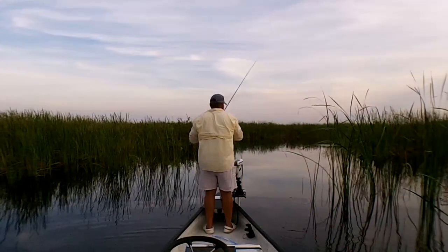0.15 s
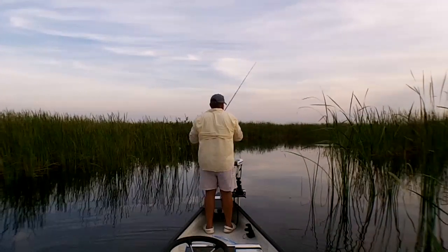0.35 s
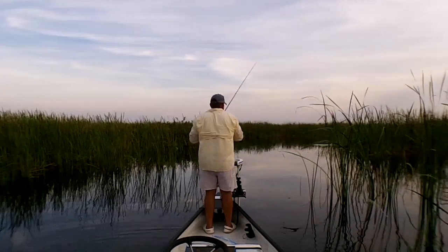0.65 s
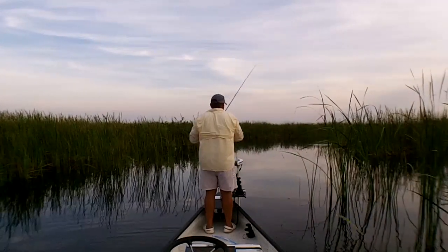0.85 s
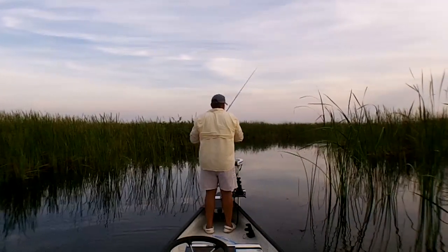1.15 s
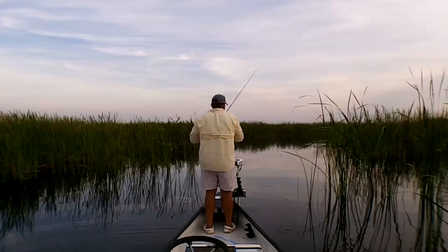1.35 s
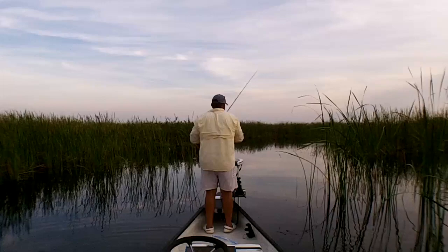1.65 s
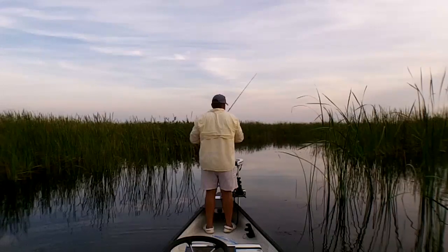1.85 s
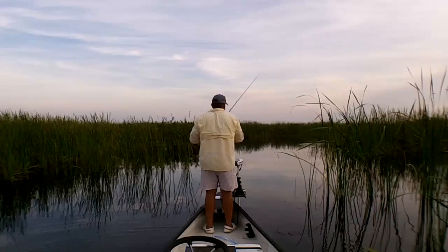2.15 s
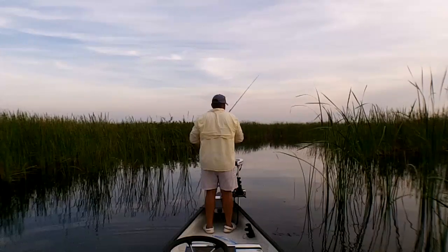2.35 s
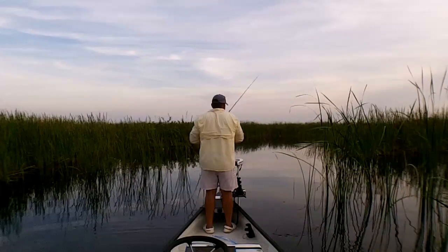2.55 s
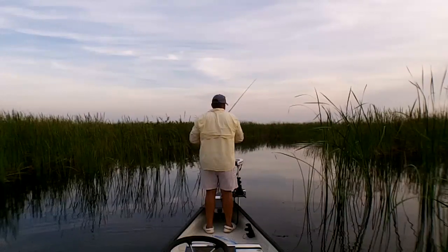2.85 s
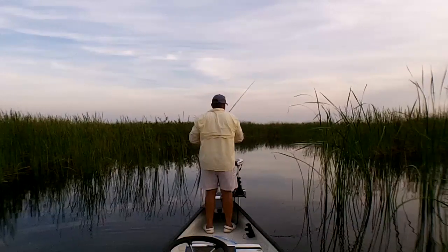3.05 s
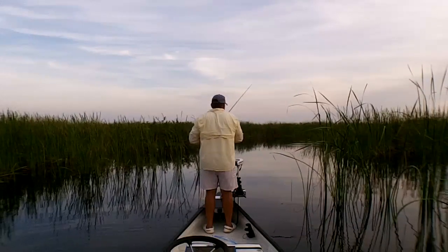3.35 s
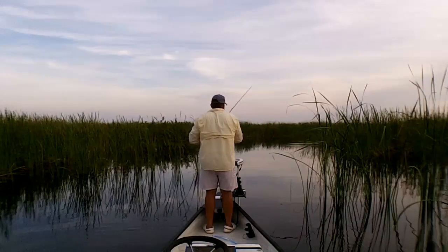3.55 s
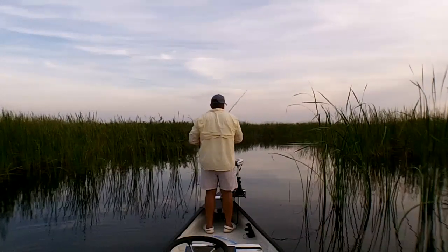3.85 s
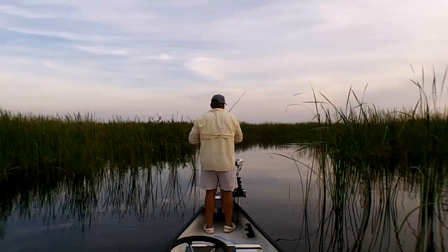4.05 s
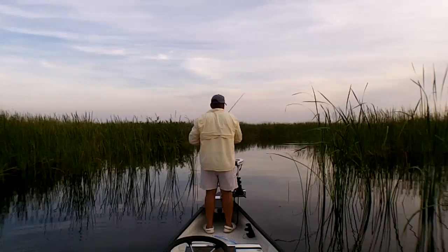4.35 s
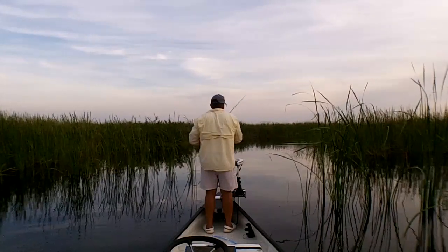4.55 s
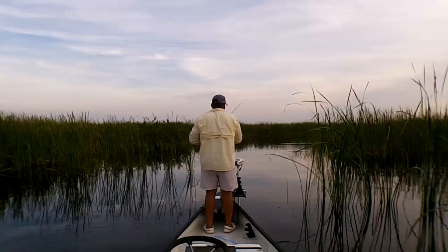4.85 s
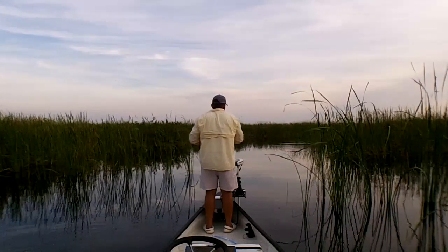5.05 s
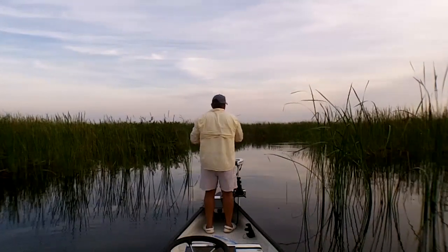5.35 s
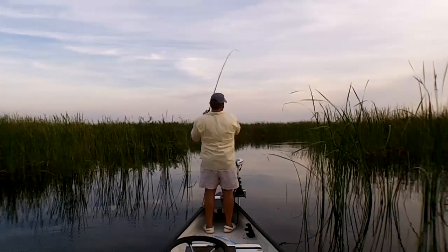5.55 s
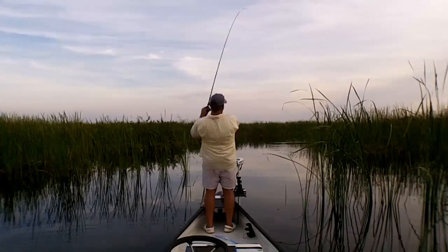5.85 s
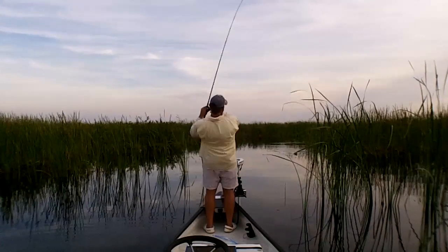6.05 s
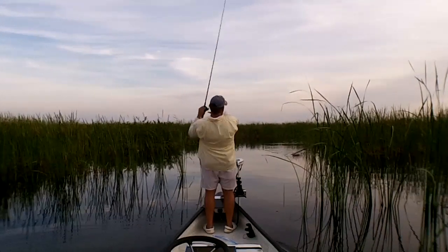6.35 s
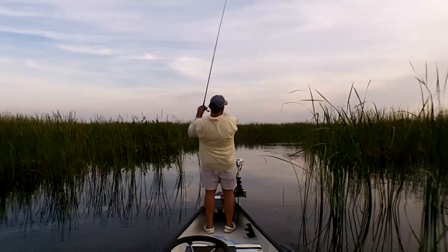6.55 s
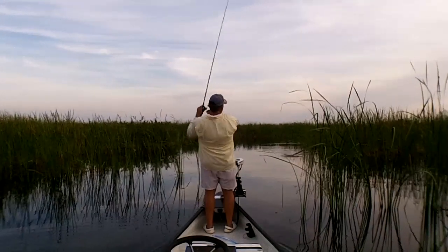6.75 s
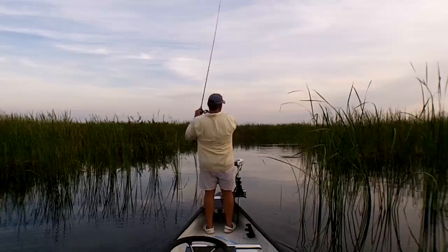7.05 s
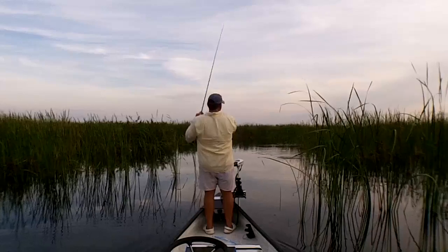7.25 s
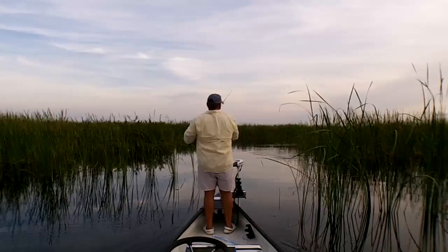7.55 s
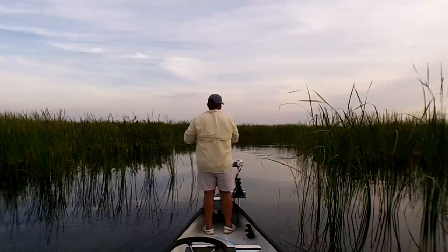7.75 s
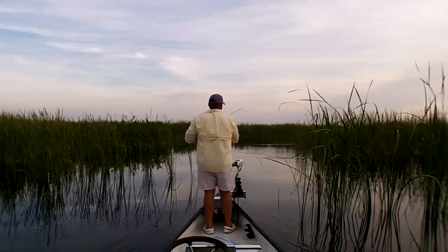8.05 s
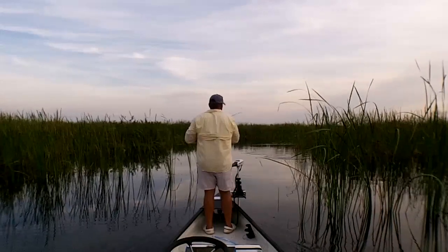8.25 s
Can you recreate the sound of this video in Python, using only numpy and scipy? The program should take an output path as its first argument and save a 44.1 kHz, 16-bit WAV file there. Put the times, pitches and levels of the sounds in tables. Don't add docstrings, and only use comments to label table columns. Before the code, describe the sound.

An angler's reel snaps loudly, then ticks and rustling sleeves, water plinks and a sharp double rod knock amid repeated dry bird chips in reeds.

```python
import sys
import numpy as np
from scipy import signal
from scipy.fft import rfft, irfft
from scipy.io import wavfile
from scipy.ndimage import uniform_filter1d

SR = 44100
rng = np.random.default_rng(int(sys.argv[2]) if len(sys.argv) > 2 else 0)


def convert_level_to_amplitude(level_db):
    exponent = np.asarray(level_db, float) / 20
    return 10 ** exponent


def persist_wave(psi):
    counts = np.round(np.clip(psi, -1, 1) * 32767).astype(np.int16)
    wavfile.write(sys.argv[1], SR, np.atleast_2d(counts).T)


N = 370440


def evened(x):
    return x / np.sqrt(np.mean(x ** 2) + 1e-20)


def peaked(x, db):
    return convert_level_to_amplitude(db) * x / np.max(abs(x))


def add(mix, s, sound):
    part = mix[round(s * SR):][:len(sound)]
    part += sound[:len(part)]


def colour(x, points):
    f, db = np.transpose(points)
    hz = np.fft.rfftfreq(len(x), 1 / SR)
    gain_db = np.interp(np.log(hz + 1), np.log(f + 1), db, left=-90, right=-90)
    return irfft(rfft(x) * convert_level_to_amplitude(gain_db), len(x))


def resonate(x, hz, width):
    turn = np.exp(2j * np.pi * np.cumsum(hz * np.ones(len(x))) / SR)
    r = np.exp(-np.pi * width / SR)
    smooth = signal.lfilter([(1 - r) ** 2], [1, -2 * r, r * r], x * turn.conj())
    return 2 * (turn * smooth).real


def flicker(per_s, depth_db):
    steps = rng.standard_normal(4000)
    return convert_level_to_amplitude(depth_db * np.interp(np.arange(N) * per_s / SR, np.arange(4000), steps))


def swell(s, length):
    t = np.arange(0, N + 64, 32) / SR - s
    share = np.where(t < 0, 0.4, 0.6)
    return -8 * (t / (share * length)) ** 2


def spread(coarse):
    return np.interp(np.arange(N), 32 * np.arange(len(coarse)), coarse)


def patchy(x, depth_db):
    z = signal.stft(x, SR, nperseg=256)[2]
    spots = uniform_filter1d(rng.standard_normal(z.shape[::-1]), size=3, axis=0)
    spots = uniform_filter1d(spots, size=4, axis=1)
    return signal.istft(z * convert_level_to_amplitude(depth_db * evened(spots).T), SR, nperseg=256)[1][:N]


def glides(rows, width, blend):
    out = np.zeros(N)
    for s, length, from_hz, to_hz, db in rows:
        hz = np.geomspace(from_hz, to_hz, round(length * SR))
        air = resonate(rng.standard_normal(SR // 4)[:len(hz)], hz, width(hz.mean()))
        arch = signal.windows.tukey(len(hz), min(blend, 1))
        add(out, s, convert_level_to_amplitude(db) * evened(air) * arch)
    return out


# frequency in Hz, level in dB per Hz.
MARSH_HUSH = [(88, -37), (150, -1.5), (325, -9.5), (1010, -15), (1400, -17), (3080, -18), (3880, -15),
              (5470, -20.5), (6340, -15.5), (6660, -22), (7600, -30.5), (9880, -70), (16700, -120)]
# centre in Hz, width in Hz, level in dB.
INSECT_BANDS = [(6393, 550, -58.5), (3800, 1300, -74)]


def marsh():
    hush = colour(rng.standard_normal(N) * flicker(9, 0.81), MARSH_HUSH)
    out = convert_level_to_amplitude(-50) * evened(hush)
    for hz, width, db in INSECT_BANDS:
        out += convert_level_to_amplitude(db) * evened(resonate(rng.standard_normal(N) * flicker(60, 1.4), hz, width))
    return out


# frequency in Hz, level in dB per Hz.
HULL_RUMBLE = [(24, -44), (40, -9.5), (68, 1.5), (88, -5.5), (107, 1), (135, -8.5), (170, -10),
               (220, -12.5), (320, -18), (420, -23.5)]
# peak in seconds, length in seconds, lift in dB.
WIND_GUSTS = [
    (0.25, 0.55, 3.5),
    (0.984, 0.16, 3),
    (1.44, 1, 2.5),
    (2.618, 0.14, 5),
    (5.91, 0.56, 7),
    (7.08, 0.93, 2.5),
    (7.75, 0.22, 1.5),
    (8.202, 0.1, 4.5),
]


def wind():
    buffet = colour(rng.standard_normal(N), [(14, -16), (24, -19), (31, -26), (38, -9), (48, -36), (62, -57)])
    rumble = colour(rng.standard_normal(N), HULL_RUMBLE)
    gust_db = spread(sum(db * convert_level_to_amplitude(swell(s, length)) for s, length, db in WIND_GUSTS))
    return convert_level_to_amplitude(-56 + 1.5 * gust_db) * evened(buffet) + convert_level_to_amplitude(-49.5 + gust_db) * evened(rumble)


# start in seconds, length in seconds, from Hz, to Hz, level in dB.
FAR_WHISTLES = [
    (.66, .07, 4050, 4400, -56),
    (.825, .12, 4750, 4050, -59),
    (7.08, .06, 5680, 5580, -52),
    (7.105, .08, 4900, 4450, -50),
]


def whistles():
    return glides(FAR_WHISTLES, lambda hz: 90, 0.58)


# start in seconds, peak in dB, pitch in Hz, 60 dB
# decay in seconds.
DRIPS_AND_LAPS = [(0.499, -43.5, 1280, 0.099), (0.848, -39, 691, 0.15), (1.585, -41.5, 1850, 0.05),
                  (2.991, -31, 418, 0.17), (3.19, -62, 301, 0.06), (3.256, -53, 423, 0.049),
                  (3.452, -42, 750, 0.06), (3.506, -38.5, 767, 0.089), (3.682, -28, 1040, 0.038),
                  (3.696, -26.5, 771, 0.082), (3.839, -33.5, 1180, 0.038), (4.14, -44, 1100, 0.048),
                  (4.398, -42.5, 920, 0.06), (4.63, -39, 637, 0.049), (4.657, -37, 1660, 0.095),
                  (4.754, -30.5, 1500, 0.014), (4.803, -39.5, 860, 0.081), (4.89, -42, 1930, 0.06),
                  (5.037, -41.5, 305, 0.051), (6.078, -34, 286, 0.21), (6.16, -58, 323, 0.044),
                  (6.218, -35, 1014, 0.03), (6.311, -32, 1490, 0.054), (6.395, -30.5, 1233, 0.04),
                  (6.594, -37, 855, 0.074), (6.652, -41, 1780, 0.069), (6.775, -31.5, 1860, 0.042),
                  (6.943, -36, 1050, 0.048), (7.499, -39, 1950, 0.039),
                  (2.546, -38.5, 400, 0.19),
    (2.771, -37.5, 294, 0.37),
    (4, -43, 600, 0.095),
    (4.02, -39, 330, 0.25),
    (5.88, -35, 500, 0.084),
    (6.309, -38.5, 586, 0.54),
    (1.751, -44, 850, 0.31),
    (3.2, -38.5, 960, 0.073),
]
# start in seconds, peak in dB, pitch in Hz.
LINE_DROPLETS = [(.897, -42, 2350), (3.521, -40, 1290), (3.683, -35, 1660), (3.748, -41, 1470),
                 (4.0, -43, 616), (4.839, -46, 880), (4.861, -39.5, 1880), (4.911, -40, 1390),
                 (4.935, -39, 1570), (4.985, -43, 1410), (5.039, -43, 940), (6.158, -40, 1510),
                 (6.219, -42, 2310), (6.912, -36.5, 1096), (8.335, -41.5, 910)]


def water():
    out, t = np.zeros(N), np.arange(6000) / SR
    droplets = [(*row, 0.07) for row in LINE_DROPLETS]
    for s, db, hz, t60 in DRIPS_AND_LAPS + droplets:
        fade = convert_level_to_amplitude(-60 * t / t60) * np.minimum(t / 0.00143, 1)
        bubble = np.sin(2 * np.pi * hz * (t + 0.66 * t ** 2))
        splash = evened(resonate(rng.standard_normal(len(t)), hz, 0.65 * hz))
        add(out, s, peaked(fade * (bubble + splash), db - 0.5))
    return out


# frequency in Hz, level in dB.
DULL_CLOTH = [(350, -11), (700, 1), (1400, 5.5), (2400, 0), (3400, -0.5), (5000, -33)]
# frequency in Hz, level in dB.
BRIGHT_CLOTH = [(1600, -38), (2500, -7), (3500, -2.5), (4600, -2), (5600, -6.5), (6800, -11.5), (7600, -32)]
# peak in seconds, length in seconds, level in dB, brightness in dB.
CLOTH_MOVES = [(1.905, 0.032, -49, -12), (2.062, 0.44, -56, -1), (2.381, 0.082, -47.5, -1.5),
               (2.59, 0.15, -50, -3.5), (2.732, 0.12, -52.5, 2), (3.19, 0.019, -51, -12),
               (3.265, 0.027, -48, -4), (3.567, 0.19, -56.5, -30), (3.686, 0.044, -48, 2),
               (3.78, 0.52, -50, -12), (3.997, 0.69, -57.5, -23), (4.293, 0.056, -54, -18),
               (4.648, 0.054, -46, 0.5), (4.761, 0.045, -47, -7), (4.94, 0.28, -52, -2),
               (5.525, 0.1, -61.5, 11.5), (6.08, 0.015, -44, -8), (6.27, 0.21, -45, -9),
               (6.346, 0.08, -39.5, -4), (6.48, 0.1, -61, -1), (6.55, 0.51, -46, -2),
               (6.686, 0.07, -42.5, 4), (6.776, 0.13, -41, -4.5), (6.953, 0.16, -52, 0.5),
               (7.114, 0.094, -49, 2), (7.36, 0.32, -53.5, -14), (7.507, 0.038, -54, -3),
               (8.0, 0.73, -64, -20), (8.249, 0.06, -53, -2), (8.336, 0.045, -53, -9)]
# start in seconds, length in seconds, from Hz, to Hz,
# level in dB.
LINE_SWISHES = [
    (2.04, .13, 4370, 4650, -54),
    (2.35, .08, 3300, 2900, -46.5),
    (5.51, .1, 2400, 2000, -52),
    (6.65, .07, 1500, 5000, -44),
    (7.23, .15, 2900, 1700, -53),
]


def rustle():
    out = glides(LINE_SWISHES, lambda hz: hz / 1.65, 0.7)
    for bright, body, lift_db in ((0, DULL_CLOTH, -4.5), (1, BRIGHT_CLOTH, 1.5)):
        power = sum(convert_level_to_amplitude(db + bright * tilt_db + swell(s, length)) ** 2
                    for s, length, db, tilt_db in CLOTH_MOVES)
        slips = rng.standard_normal(N) * flicker(800, 3.4) * flicker(30, 1.14)
        out += convert_level_to_amplitude(lift_db) * spread(np.sqrt(power)) * evened(colour(slips, body))
    return convert_level_to_amplitude(0.75) * patchy(out, 2.66)


# peak time in seconds, peak in dB, pitch in Hz,
# length in cycles.
REEL_LINE_CRACKLES = [(2.198, -36, 3800, 5), (2.241, -38, 4700, 6), (2.242, -44, 1800, 4),
                      (2.348, -43, 3150, 5), (2.357, -38, 2550, 4.5), (2.377, -32, 2900, 4.3),
                      (2.572, -41, 2570, 6), (2.688, -38, 4400, 6), (3.928, -36, 4200, 2.5),
                      (3.963, -33, 2900, 2.5), (4.686, -33, 4500, 4), (4.758, -35, 5700, 5)]
# peak time in seconds, peak in dB, pitch in Hz,
# length in cycles.
ROD_LINE_CRACKLES = [(6.0752, -35.5, 2320, 4), (6.0795, -36, 3560, 6.6), (6.0965, -40, 3400, 3.6),
                     (6.219, -34.5, 2310, 7), (6.25, -41, 2050, 6), (6.271, -42, 2300, 6),
                     (6.281, -38, 3500, 4), (6.313, -37, 3500, 5), (6.348, -24, 4250, 4),
                     (6.35, -34, 2800, 4.6), (6.373, -29.5, 1760, 3), (6.381, -28, 4200, 5),
                     (6.397, -31, 4100, 4), (6.519, -33, 3380, 3.6), (6.5195, -32, 1900, 4),
                     (6.582, -33.5, 2190, 3), (6.656, -36.5, 950, 4.4), (6.672, -31, 2580, 5),
                     (6.678, -36, 1440, 6.7), (6.681, -30, 4800, 5), (6.688, -29, 1960, 6),
                     (6.693, -28, 2600, 5), (6.6935, -20, 4130, 1.3), (6.699, -35, 4300, 5),
                     (6.709, -28, 4700, 6), (6.724, -35, 4500, 4), (6.761, -38, 1400, 6),
                     (6.7775, -35, 1200, 1.3), (6.8116, -18, 4500, 4.4), (6.818, -35, 4600, 4),
                     (6.827, -34, 4700, 5), (8.2545, -31, 4890, 3), (8.241, -38, 4700, 4),
                     (8.327, -37, 5400, 3), (8.341, -35, 3000, 6), (6.359, -37, 750, 5),
                     (6.345, -33, 1900, 4), (6.74, -40, 1300, 6), (6.575, -33, 4200, 4),
                     (7.107, -35, 4300, 1.5), (7.11, -35, 4800, 6), (7.123, -35.5, 3000, 8),
                     (7.32, -39, 2520, 5.5), (7.341, -39, 1800, 6), (7.345, -40, 2400, 5),
                     (7.363, -41, 2300, 5), (7.446, -39, 1900, 3), (7.5, -34, 2900, 2.5)]


def crackles():
    out = np.zeros(N)
    for s, db, hz, cycles in REEL_LINE_CRACKLES + ROD_LINE_CRACKLES:
        length = cycles / hz
        u = np.arange(-1.5 * length, 1.5 * length, 1 / SR) * hz / cycles
        bell = np.exp(-3.2 * u ** 2)
        tone = np.sin(2 * np.pi * cycles * (u + 0.19 * u ** 2 / 2))
        add(out, s + u[0] * length, convert_level_to_amplitude(db) * bell * tone)
    return out


# peak in seconds, length in seconds, level in dB.
SPOOL_RATTLES = [
    (2.617, 0.11, -48),
    (2.737, 0.086, -45),
    (6.7, 0.05, -50),
]
# frequency in Hz, width in Hz, level in dB.
SPOOL_MODES = [(2500, 150, -3), (3060, 150, 0), (3900, 280, 0), (4500, 130, 3)]


def spool():
    taps = (rng.random(N) < 640 / SR) * rng.standard_normal(N)
    out = sum(convert_level_to_amplitude(db) * evened(resonate(taps * flicker(50, 6.3), hz, width)) for hz, width, db in SPOOL_MODES)
    return spread(sum(convert_level_to_amplitude(db + swell(s, length)) for s, length, db in SPOOL_RATTLES)) * evened(out)


# start in seconds, peak in dB, centre in Hz.
REEL_TICKS = [(0.85, -35, 4500), (1.3338, -28, 3300), (1.8716, -37, 3640), (1.909, -36, 2780),
              (2.122, -36, 4650), (2.197, -39, 3720), (2.24, -35, 3025), (2.5454, -35, 4220),
              (2.716, -44, 2550), (2.7602, -27.5, 4350), (3.274, -32.5, 3450), (3.641, -31, 3940),
              (3.7284, -32, 4370), (3.922, -34, 4070), (3.9634, -33, 3900), (4.037, -36.5, 5210),
              (4.111, -37.5, 3760), (4.629, -35, 3350), (4.686, -29.5, 4200), (4.756, -31, 3620),
              (5.0973, -32, 4100), (5.1475, -34, 4230)]
# start in seconds, peak in dB, centre in Hz.
ROD_KNOCKS = [(6.074, -29, 3520), (6.227, -37, 4440), (6.45, -26, 3800), (6.4628, -11, 3550),
              (6.4712, -12, 3850), (6.519, -24.5, 3330), (6.5824, -35, 3810), (6.654, -26, 5200),
              (6.691, -35, 4100), (6.783, -24.5, 4150), (6.812, -25, 4400), (6.971, -36, 4180),
              (7.0425, -31, 3880), (7.488, -43, 3300), (7.61, -41, 4000), (8.239, -37, 4650),
              (8.261, -30.5, 3460)]
# start in seconds, peak in dB, centre in Hz, width in Hz,
# 60 dB decay in seconds.
ROD_SCUFFS = [
    (0.852, -34, 1480, 2600, 0.18),
    (1.338, -37, 1100, 2600, 0.47),
    (4.632, -30.5, 2510, 4030, 0.11),
    (6.463, -21, 2110, 1490, 0.03),
    (6.47, -23.5, 2120, 1500, 0.072),
    (6.4628, -18, 5960, 1810, 0.0066),
    (6.4712, -18.5, 5640, 1800, 0.0083),
    (6.693, -30, 3500, 4000, 0.022),
]


def tackle():
    out, t = np.zeros(N), np.arange(3500) / SR
    ticks = [(*row, 1700, 0.042) for row in REEL_TICKS]
    knocks = [(*row, 1700, 0.022) for row in ROD_KNOCKS]
    for s, db, hz, width, t60 in ticks + knocks + ROD_SCUFFS:
        fade = convert_level_to_amplitude(-60 * t / (0.1 * t60)) + convert_level_to_amplitude(-5 - 60 * t / t60)
        blow = rng.standard_normal(len(t)) * fade
        add(out, s, peaked(resonate(blow, hz, width), db - 0.3))
    return out


# start in seconds, peak in dB.
LATCH_SNAP = [
    (1.632, -2),
]
# frequency in Hz, level in dB, 60 dB decay in seconds.
LATCH_MODES = [(759, -8, 0.1), (880, -12, 0.07), (1022, -3, 0.12), (1100, -8, 0.09), (1507, -12, 0.08),
               (1717, 1, 0.037), (1981, -7, 0.05), (2530, -11, 0.08), (2772, 1, 0.045), (3020, -5, 0.04),
               (3758, 2, 0.035), (4393, -9, 0.05), (4867, -12, 0.056), (6250, -29, 0.085)]
# frequency in Hz, level in dB.
LATCH_CRACK = [(520, -39), (800, -6), (1600, -15), (2700, -1.5), (3300, -10), (3900, 0.5), (5300, -9.5),
               (7300, -39)]


def latch():
    out, t = np.zeros(N), np.arange(6000) / SR
    s, db = LATCH_SNAP[0]
    blow = rng.standard_normal(len(t)) * (convert_level_to_amplitude(-4 - 60 * t / 0.02) + convert_level_to_amplitude(-30 - 60 * t / 0.12))
    blow[[2, 45, 91]] += 2.2, 0.5, 5.0
    crack = colour(np.pad(blow, (0, 500)), LATCH_CRACK)[:len(t)]
    add(out, s - 0.0012, peaked(crack, db - 1.5))
    wobble = 1 + 0.55 * evened(uniform_filter1d(rng.standard_normal(len(t)), 150))
    ring = sum(convert_level_to_amplitude(d - 60 * t / t60) * np.sin(2 * np.pi * hz * t) for hz, d, t60 in LATCH_MODES)
    add(out, s + 0.00223, convert_level_to_amplitude(db - 24.5) * ring * wobble * np.minimum(t / 0.001, 1))
    return out


def reeds(chip):
    lag = np.arange(SR // 2) / SR
    near, far = rng.standard_normal((2, len(lag)))
    far = colour(far, [(2000, -17), (3500, 2), (3950, 0), (4300, -4), (8000, -20)])
    echo = near * convert_level_to_amplitude(-60 * lag / 0.22) + far * convert_level_to_amplitude(-2.5 - 60 * lag / 0.69)
    echo *= lag > 0.004
    tail = signal.fftconvolve(chip, echo / np.linalg.norm(echo))
    sway = evened(uniform_filter1d(rng.standard_normal(len(tail)), size=90))
    return convert_level_to_amplitude(-6.5) * tail * (1.75 + 0.41 * sway)


# start in seconds, peak in dB, throat in Hz, length in seconds.
DISTANT_CHIPS = [
    (.598, -46, 3750, 0.028),
    (1.0, -48, 3660, 0.018),
    (1.449, -40.5, 3930, .015),
    (2.378, -41, 4220, 0.036),
]
# start in seconds, peak in dB, throat in Hz, length in seconds.
NEAR_CHIPS = [(3.116, -34.5, 4220, 0.021), (3.821, -33.5, 4230, 0.035), (4.355, -33, 4180, 0.038),
              (4.899, -33, 4200, 0.03), (5.44, -31.5, 4160, 0.038), (5.768, -31, 4160, 0.027),
              (6.3335, -33.5, 4190, 0.056), (6.909, -32, 4155, 0.033), (7.169, -27.5, 4030, 0.023),
              (7.676, -30, 4110, 0.035), (7.97, -30, 4100, 0.035), (8.338, -28, 4090, 0.034)]
# share of the throat frequency, width in Hz, level in dB.
THROAT_MODES = [(1.01, 320, 3.5), (0.92, 480, -5), (0.81, 560, -11)]


def bird():
    out, t = np.zeros(N), np.arange(3000) / SR
    for s, db, hz, length in DISTANT_CHIPS + NEAR_CHIPS:
        chance = rng.standard_normal((3, len(t)))
        turns = np.cumsum(260 * (1 + 2.9 * uniform_filter1d(chance[0], 120))) / SR
        pulses = np.diff(np.floor(turns), prepend=-1) * convert_level_to_amplitude(2.2 * chance[1])
        pulses += 0.045 * chance[2]
        pulses[0] = 1.24
        done = np.minimum(t / length, 1)
        effort = convert_level_to_amplitude(-done) * np.clip((length - t) / 0.0047, 0, 1)
        pulses *= effort
        throat_hz = hz * (1 + 0.0047 * done)
        chip = np.zeros(len(t))
        for share, width, mode_db in THROAT_MODES:
            side_db = (share < 0.96) * 7 * done
            chip += convert_level_to_amplitude(mode_db + side_db) * resonate(pulses, share * throat_hz, width)
        core = effort * resonate(chance[2] + 30 * (t == 0), throat_hz, 120)
        chip = evened(chip) + convert_level_to_amplitude(-5.5) * evened(core)
        chip = convert_level_to_amplitude(db - 10) * evened(chip) * np.sqrt(length / t[-1])
        add(out, s - 0.0012, chip)
        add(out, s - 0.0012, reeds(chip))
    return out


def scene():
    far = marsh() + wind() + whistles()
    boat = water() + rustle() + crackles() + spool() + tackle() + latch()
    mono = far + boat + bird()
    return np.array([mono, mono])


# frequency in Hz, level in dB.
TOP_HISS = [(7400, -52), (8200, -2), (9500, -2.5), (10800, 1.5), (11700, 1), (11840, -16), (11980, 0),
            (15100, -0.5), (15450, -44)]
# frequency in Hz, level in dB.
WHINE_TONES = [(11419, -84), (11569, -88), (11718.5, -84), (11958, -91), (12108, -79), (12258, -87)]


def top_band(sound):
    t = np.arange(N) / SR
    bright = colour(sound, [(5000, -40), (5600, 1.5), (7000, 2), (7600, -40)])
    burst = abs(uniform_filter1d(bright ** 2, 60)) ** 0.5
    burst *= np.exp(-((t - 6.468) / 0.012) ** 2)
    hiss = evened(colour(rng.standard_normal(N), TOP_HISS))
    echo = colour(burst * rng.standard_normal(N),
                  [(8500, -24), (9200, 1), (11800, 2.5), (12600, -20), (15500, -18), (16000, -40)])
    whine = sum(convert_level_to_amplitude(db + 2.5) * np.sin(2 * np.pi * hz * t) for hz, db in WHINE_TONES)
    return convert_level_to_amplitude(-58.74) * hiss + whine + convert_level_to_amplitude(-2) * echo


# frequency in Hz, share dropped from 0 to 1.
DROPPED_SHARE = [(6900, 0), (7200, 0.42), (7500, 1), (7700, 0.96), (8150, 1), (8350, 0.68), (8550, 0.08),
                 (9000, 0.11), (14800, 0.12), (15300, 0.4)]


def holes(x):
    hz, t, z = signal.stft(x, SR, nperseg=1024, noverlap=512)
    draw = rng.random((len(t) // 3 + 1, len(hz) // 5 + 1))
    draw = np.repeat(np.repeat(draw, 3, 0), 5, 1)[:len(t), :len(hz)].T
    keep = draw > np.interp(hz, *np.transpose(DROPPED_SHARE), left=0)[:, None]
    return signal.istft(z * keep, SR, nperseg=1024, noverlap=512)[1][:N]


def top_cut(x):
    return signal.sosfilt(signal.butter(12, 16150, fs=SR, output="sos"), x)


def record(dry):
    low = colour(dry[0], [(8, -32), (20, -1.5), (6900, -0.5), (7400, 1), (7800, 6), (8200, -60)])
    x = holes(low + top_band(dry[0]))
    return top_cut(np.array([x, x]))


dry = scene()
out = record(dry)
persist_wave(out)
```